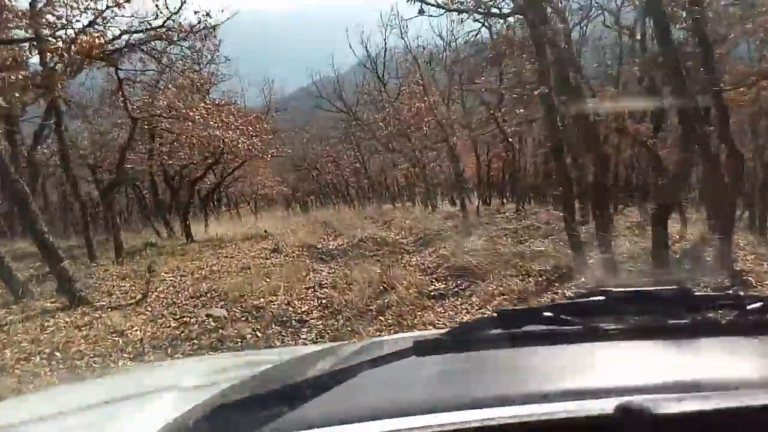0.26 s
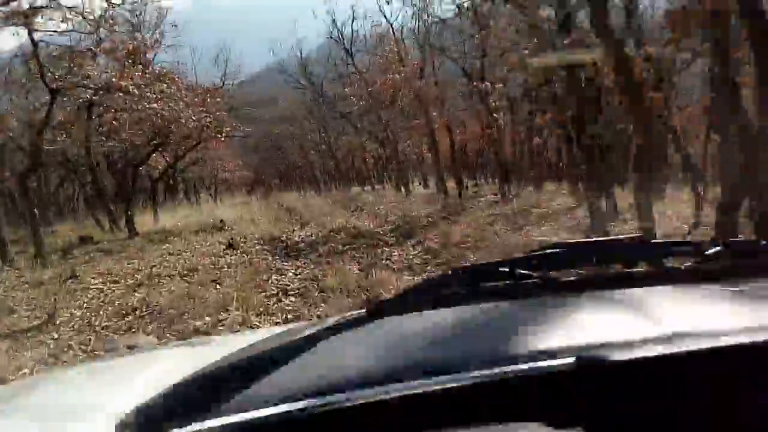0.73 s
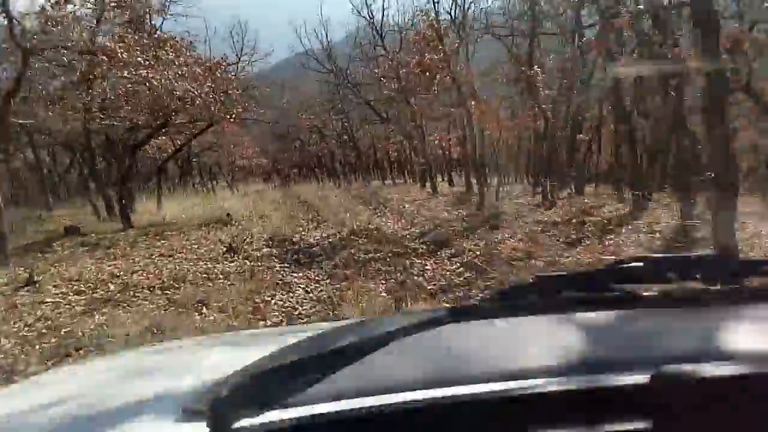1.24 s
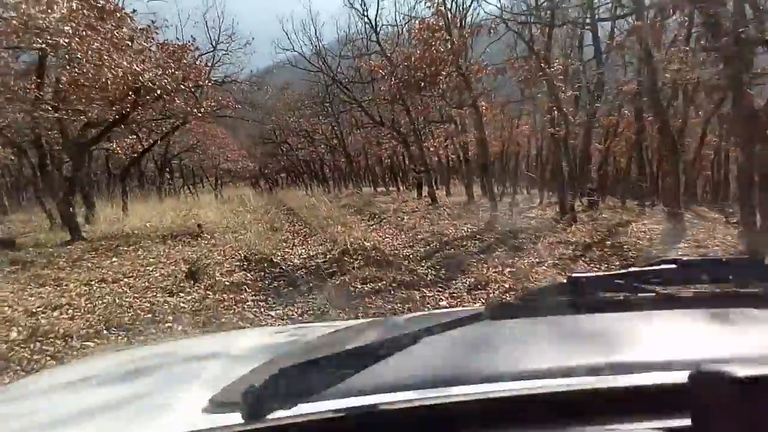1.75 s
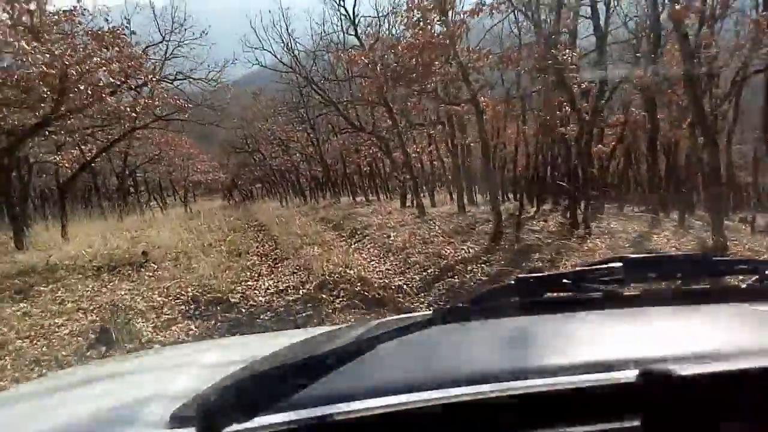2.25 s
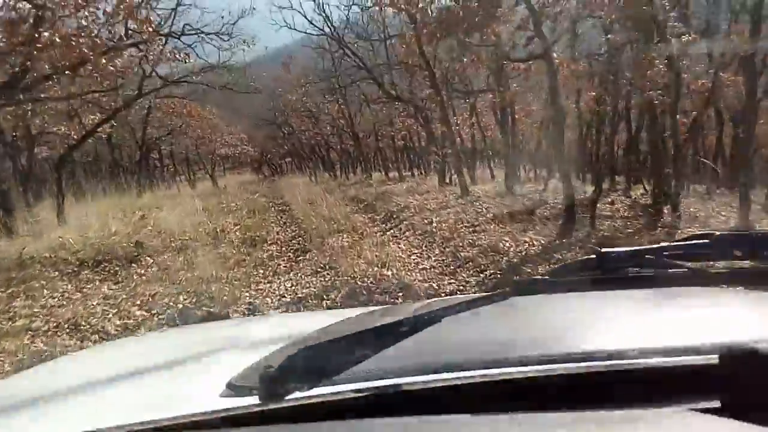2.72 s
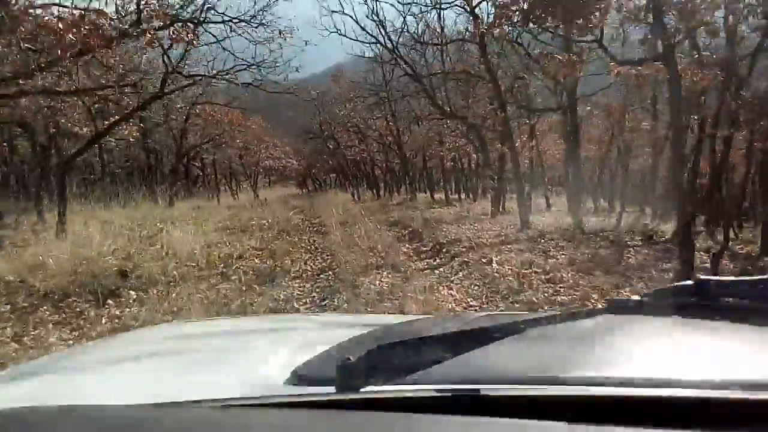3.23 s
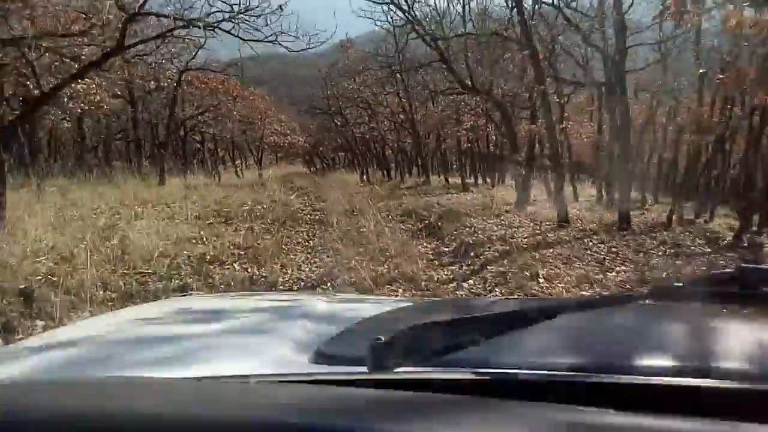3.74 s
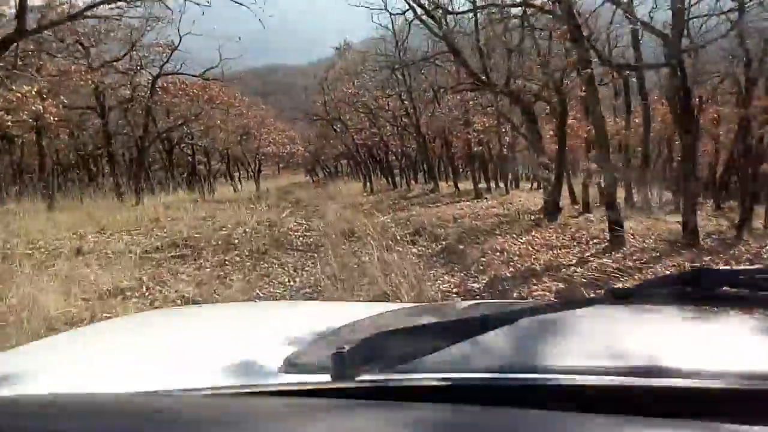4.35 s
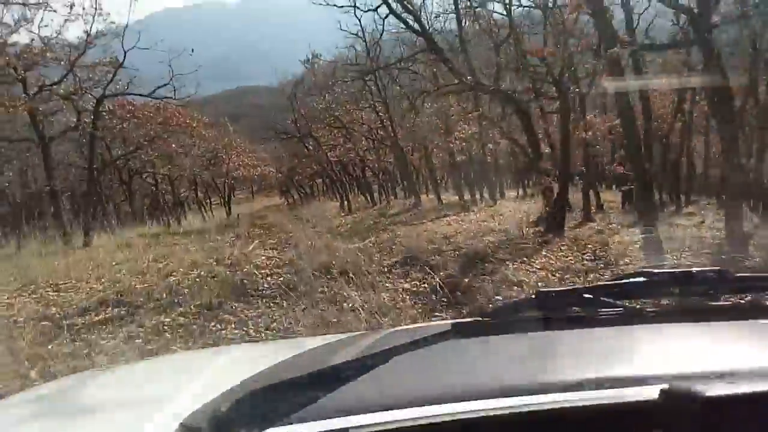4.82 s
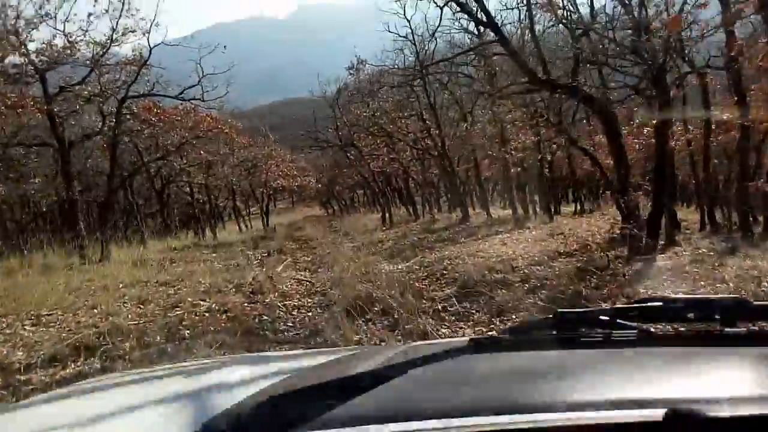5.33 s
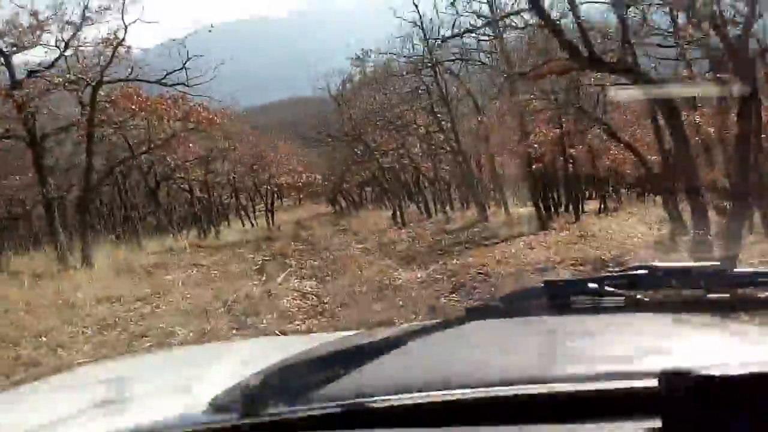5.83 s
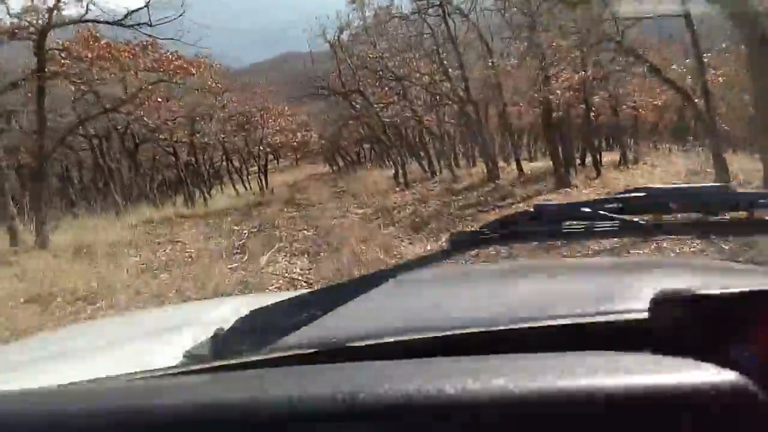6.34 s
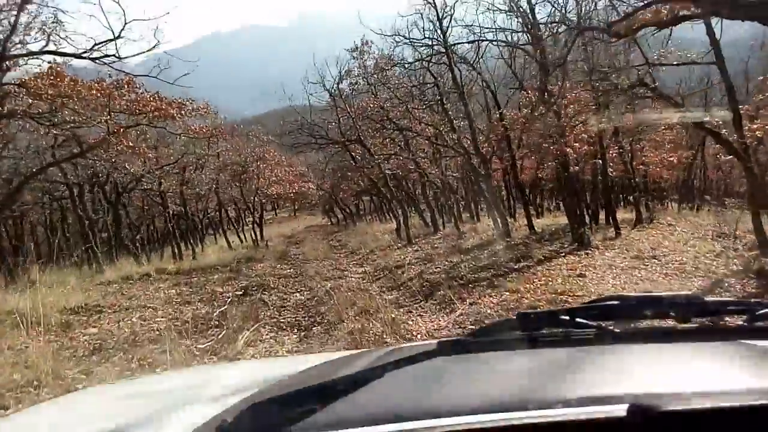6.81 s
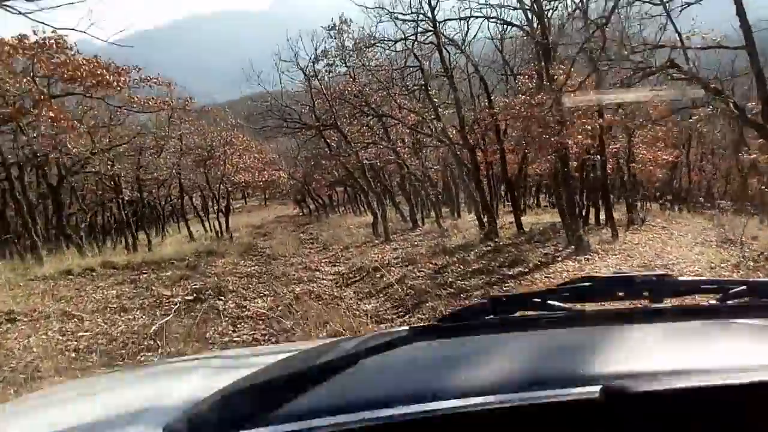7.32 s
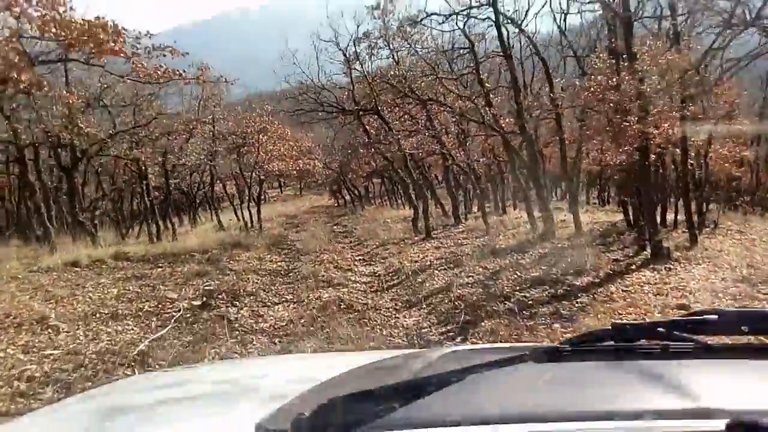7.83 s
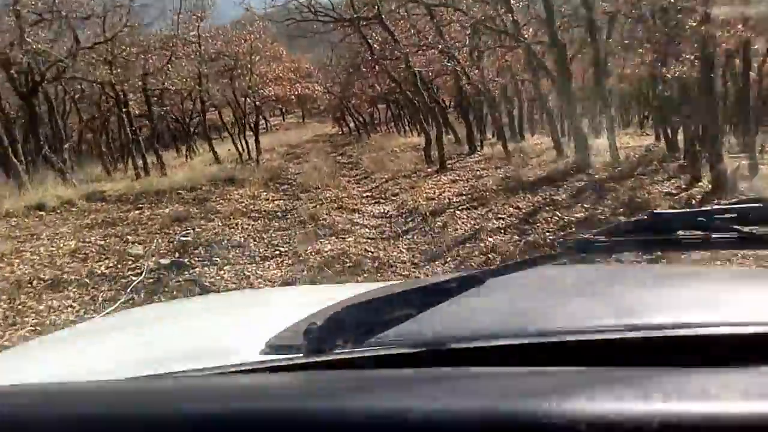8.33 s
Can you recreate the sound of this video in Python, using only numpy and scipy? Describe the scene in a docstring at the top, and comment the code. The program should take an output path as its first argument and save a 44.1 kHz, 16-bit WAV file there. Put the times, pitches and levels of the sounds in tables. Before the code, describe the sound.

A car cabin rumbles and knocks over uneven ground while dry leaves crunch, twigs snap sharply and small loose metal parts clink faintly.

```python
"""A low rumble with thuds: a car crawls along a rough, leafy woodland track, heard from inside the cabin.
The ground shakes the body (shaped noise) and knocks its panels (damped sines) over an engine hum (harmonics).
Leaves crackle (noise with random puffs), twigs snap (noise bursts with a short ring), a stem drags along a
panel (noise through sliding resonances) and small loose metal clinks (struck resonators).
The snaps and clinks excite a short cabin decay, and the whole is cut steeply above 15.75 kHz."""
import sys
import numpy as np
from scipy import signal
from scipy.fft import rfft, irfft, next_fast_len
from scipy.io import wavfile
from scipy.ndimage import map_coordinates

SR = 44100
rng = np.random.default_rng(int(sys.argv[2]) if len(sys.argv) > 2 else 0)


def generate_wav(sig):
    """Save sig (samples, or channels by samples) to the path in sys.argv[1] as 16-bit PCM at SR."""
    pcm = np.round(np.clip(np.atleast_2d(sig).T, -1, 1) * 32767).astype(np.int16)
    wavfile.write(sys.argv[1], SR, pcm)


N = 377937   # samples


def amp(db):
    """Decibel law: the amplitude gain of a level in dB."""
    return 10 ** (np.asarray(db) / 20)


def rms_one(x):
    """Power normalisation: scale to rms 1."""
    return x / np.sqrt(np.mean(x ** 2) + 1e-20)


def in_time(rows):
    """Linear interpolation: each column of a curve table at every sample."""
    times, *columns = np.transpose(rows)
    return [np.interp(np.arange(N) / SR, times, column) for column in columns]


def colour(x, spectrum, peaks=(), band=(1, 1e6)):
    """Spectral filtering by a (Hz, dB) curve, lifted resonances and a soft-edged band; white rms 1 stays 1."""
    size = next_fast_len(N)
    hz = np.arange(size // 2 + 1) * SR / size + 1   # offset by 1 Hz to keep the logarithm finite
    points = np.array(spectrum)
    db = np.interp(np.log(hz), np.log(points[:, 0]), points[:, 1])
    for peak_hz, width_hz, lift_db in peaks:
        db = db + lift_db / (1 + (2 * (hz - peak_hz) / width_hz) ** 2)
    edge_loss = np.sqrt((1 + (band[0] / hz) ** 12) * (1 + (hz / band[1]) ** 12))
    gain = rms_one(amp(db) / edge_loss)
    return irfft(rfft(x, size) * gain, size)[:N]


def drift(rate_hz):
    """Low-pass filtered noise: a slow random wander of rms 1."""
    step = 40   # samples between points of the wander
    r = np.exp(-2 * np.pi * step * rate_hz / SR)
    white = rng.standard_normal(N // step + 4002)
    slow = signal.lfilter([1], [1, -2 * r, r * r], white)[4000:]   # drop the filter's start-up
    return np.interp(np.arange(N) / step, np.arange(len(slow)), rms_one(slow))


def ring(clicks, hz, t60_s):
    """Damped resonator: a unit click sets a decaying sine of height 1 ringing."""
    r = amp(-60 / (t60_s * SR))
    w = 2 * np.pi * hz / SR
    return signal.lfilter([0, np.sin(w)], [1, -2 * r * np.cos(w), r * r], clicks + 1e-18)


def resonance(x, hz, width_hz):
    """Reciprocity of bandwidth and decay: noise through one resonator, scaled to rms 1."""
    return rms_one(ring(x, hz, np.log(1000) / np.pi / width_hz))


def puffs(per_s):
    """Shot noise: random short swells of uneven size, a few ms up and a little longer down."""
    size = amp(1.5 * np.minimum(rng.exponential(1, N), 4))
    born = (rng.random(N) < per_s / SR) * size
    r = np.exp(-1 / (0.0044 * SR))
    return signal.lfilter([np.e * (1 - r)], [1, -2 * r, r * r], born + 1e-18)


def rumble(boom_db, buzz_db):
    """Forced vibration: rough ground shakes chassis, floor and panels, and the cabin air sings along."""
    # slow course of the deep chassis rumble [t/s, level/dB]
    deep_course = [(0.0, -30.5), (0.43, -26.5), (0.62, -32.5), (1.96, -28.5), (3.27, -25.5), (3.51, -26.5),
                   (3.94, -24), (6.66, -26), (6.9, -32), (8.35, -30), (8.57, -30)]
    # spectra of chassis, floor and panels [f/Hz, relative level/dB per Hz]
    deep_spectrum = [(8.8, -52.5), (15, -22.5), (49, -4), (108, -7.5), (130, -8), (170, -24), (290, -120)]
    boom_spectrum = [(41, -20.5), (70, -3), (145, 0), (199, -3.5), (324, -16.5), (372, -26.5), (400, -18),
                     (520, -28), (880, -120)]
    buzz_spectrum = [(120, -31.5), (200, -5), (234, -5), (360, -4), (705, -13.5), (955, -12.5), (1180, -32),
                     (1300, -16), (1800, -46), (2340, -59.5), (3960, -120)]
    # cabin resonances [f/Hz, width/Hz, level/dB relative to the mean boom setting]
    air_modes = [(147, 7, -6), (233, 9, -12), (92, 8, -13)]
    air_shake = 0.18   # share of the swing of the boom, in dB, that the cabin air follows
    drone_hz, drone_width_hz, drone_db = 925, 310, -48.5   # steady hollow note of the engine bay

    white = rng.standard_normal((4, N))
    deep = amp(in_time(deep_course)[0]) * colour(white[0], deep_spectrum)
    boom = amp(boom_db - 1.0 + 2.2 * drift(6.1)) * colour(white[1], boom_spectrum)
    buzz = amp(buzz_db + 1.5 * drift(14)) * colour(white[3], buzz_spectrum)
    air = sum(amp(db) * resonance(white[2], hz, width_hz) for hz, width_hz, db in air_modes)
    air_db = boom_db.mean() + air_shake * (boom_db - boom_db.mean())
    drone = amp(drone_db) * resonance(white[0], drone_hz, drone_width_hz)
    return deep + boom + amp(air_db) * air + buzz + drone


def thuds():
    """Impact response: a soft push rings the struck part at its pitch and at a fifth above."""
    # wheels over roots and stones knock floor, panels and trim
    # [t/s, level/dB before the soft rise and the upper partial, f/Hz]
    knocks = [(1.112, -10, 133.5), (1.212, -7, 128), (1.283, -15, 142), (1.808, -12, 152),
              (2.244, -8.5, 145.7), (2.417, -9, 152), (2.435, -14, 459), (2.771, -17.5, 156),
              (3.085, -6, 128), (3.125, -6, 134), (3.21, -14, 168), (3.736, -5.5, 185), (3.819, -17.5, 495),
              (3.93, -6, 120), (3.977, -1, 130.5), (4.027, -18, 408), (4.052, -18.5, 1240),
              (4.066, -16, 355), (4.196, -6.5, 136), (4.366, -11, 157), (4.571, -6.5, 85),
              (4.697, -8.5, 188), (4.799, -4.5, 132.5), (4.799, -14, 456), (4.904, -4.5, 134),
              (5.04, -2, 186.5), (5.097, -24, 1330), (5.119, -4.5, 121), (5.168, -15.5, 405),
              (5.185, -21, 1300), (5.322, -13, 114), (5.378, -24, 950), (5.394, -15.5, 517),
              (5.441, -6.5, 140), (5.449, -16, 408), (6.05, -23, 1920), (6.093, -5.5, 140),
              (6.195, -10, 171), (6.556, -19.5, 450), (6.565, -16, 102), (7.003, -21, 1244),
              (7.137, -20, 141), (7.206, -20, 473), (8.039, -13.5, 137), (8.045, -16.5, 457)]
    t60_at_150_hz, t60_slope = 0.12, -.4   # s; power of pitch: higher panels die sooner
    rise_s = 0.0035

    out = np.zeros(N + SR)
    t = np.arange(SR // 2) / SR
    rise = 1 - np.exp(-t / rise_s)
    for s, db, hz in knocks:
        t60_s = t60_at_150_hz * (hz / 150) ** t60_slope
        wave = np.sin(2 * np.pi * hz * t) + 0.43 * np.sin(2 * np.pi * 1.5 * hz * t)
        i = round(s * SR)
        out[i:i + len(t)] += amp(db - 60 * t / t60_s) * rise * wave
    return out[:N]


def engine():
    """Periodic excitation: low orders of the firing rate, each wavering in strength."""
    # course of the engine [t/s, mean firing rate/Hz, level/dB applied to the sum of orders]
    running = [(0, 72, -32.5), (1.2, 44, -32.5), (2.2, 58, -23.5), (3.6, 58, -33), (5.5, 63, -48),
               (7, 43.4, -42), (8.57, 56.5, -33.5)]
    # partials of the hum [multiple of the firing rate, mean relative level/dB]
    orders = [(1, 0), (1.5, -10), (2, -11), (3, -14), (4, -14)]

    rate_hz, level_db = in_time(running)
    unsteady_hz = rate_hz * (1 + 0.01233 * drift(3.9))
    phase = 2 * np.pi * np.cumsum(unsteady_hz) / SR
    hum = 0
    for order, db in orders:
        hum = hum + amp(db + 2 * drift(2)) * np.sin(order * phase + rng.uniform(0, 2 * np.pi))
    return amp(level_db) * hum


def leaves(level_db):
    """Granular fracture: dry leaves crush under the tyres as patchy hiss with wide and one-band puffs."""
    # spectrum of the crushed leaves [f/Hz, relative level/dB per Hz]
    leaf_spectrum = [(590, -31), (1000, 0), (2180, -5.5), (2550, -3), (2800, -6.5), (3090, -6.5),
                     (3930, -9), (4160, -8.5), (5050, -4), (5720, -0.5), (6480, -5), (10000, -63),
                     (13000, -88.5), (22000, -120)]
    puff_crush = 0.73   # share of the swing of crush, in dB, that the rate of puffs follows
    edges_hz = [500, 1600, 2600, 4000, 5600, 8000, 16000]

    white = rng.standard_normal((2, N))
    busy = amp(puff_crush * (level_db - level_db.mean()))
    shared = drift(9)
    wide = puffs(24.0 * busy)
    out = 0
    for k, (low, high) in enumerate(zip(edges_hz, edges_hz[1:])):
        bandpass = signal.butter(2, [low, high], "band", fs=SR, output="sos")
        band = signal.sosfilt(bandpass, white[k % 2])
        patches = amp(busy * (1.2 * shared + 1.8 * drift(16.3)))   # busier crushing is patchier
        out = out + band * patches * (1 + 0.49 * wide + 0.56 * puffs(9.0 * busy))
    return amp(level_db) * rms_one(colour(out, leaf_spectrum))


def snaps():
    """Brittle fracture: a crackly burst swells briefly, brighter with its pitch, with a short unsteady ring."""
    # snaps and rattles [t/s, reference level/dB, ring f/Hz,
    # low band/dB and top band/dB relative to the reference, t60/s]
    breaks = [(0.9233, -15.5, 3210, -8, -56, 0.06), (1.1672, -23.5, 2030, -5, -34, 0.041),
              (1.4401, -17.5, 5730, -16, -59, 0.092), (1.492, -13.5, 5670, -13, -57, 0.031),
              (1.6322, -27.5, 5670, -1, -47, 0.16), (1.8848, -22.5, 2430, -5, -47, 0.06),
              (2.1505, -21, 5813, -4, -50, 0.06), (2.394, -15.5, 2070, -7.5, -42, 0.085),
              (2.403, -7, 5320, -12, -34, 0.08), (2.4882, -14, 2020, -6.5, -24, 0.094),
              (2.5532, -10, 4050, -21, -49, 0.034), (2.743, -4.5, 5630, -17, -45, 0.037),
              (2.8235, -16.5, 3830, -18, -35, 0.053), (2.8374, -20.5, 5640, -16, -39, 0.051),
              (2.8977, -23.5, 6200, -21, -11, 0.045), (2.9706, -9.5, 5570, -13.5, -43, 0.032),
              (3.036, -11, 5900, -17, -26, 0.09), (3.0734, -13.5, 5960, -12.5, -26, 0.082),
              (3.0974, -19.5, 2980, -10, -32, 0.052), (3.1203, -14, 2100, -12, -38, 0.041),
              (3.1436, -8.5, 5900, -29, -43, 0.051), (3.1624, -13, 5400, -22.5, -33, 0.052),
              (3.282, -19, 6400, -8.5, -45, 0.057), (3.5475, -10, 3610, -10, -37, 0.031),
              (3.6516, -25, 5760, -9, -22, 0.06), (3.695, -17.5, 2590, -7, -34, 0.073),
              (3.723, -19, 3310, -18, -25, 0.06), (3.8303, -13, 3610, -12.5, -33, 0.054),
              (3.8632, -6.5, 4870, -17, -60, 0.053), (3.912, -13.5, 5770, -16, -29, 0.05),
              (3.978, -15.5, 5120, -21.5, -19, 0.049), (4.012, -27, 3510, -1, -42, 0.035),
              (4.05, -32.5, 2040, 8, -29, 0.032), (4.0978, -15, 6230, -12, -23, 0.052),
              (4.1163, -14, 3520, -8, -34, 0.088), (4.154, -10.5, 4950, -9, -43, 0.083),
              (4.2512, -21.5, 5610, -20, -23, 0.078), (4.3725, -10, 2110, -12, -30, 0.06),
              (4.4513, -13, 3580, -12, -46, 0.06), (4.5316, -23, 5130, -15, -35, 0.021),
              (4.611, -18, 2300, -16, -39, 0.072), (4.6415, -4, 5570, -18.5, -42, 0.072),
              (4.6572, -10, 5800, -16.5, -38, 0.048), (4.727, -12, 5800, -9, -48, 0.072),
              (4.7948, -9, 5300, -8.5, -53, 0.038), (4.8487, -11.5, 3780, -12, -43, 0.06),
              (4.8788, -16, 3740, -22, -36, 0.052), (5.0005, -19.5, 6130, -16, -48, 0.065),
              (5.1018, -24, 5390, -0.5, -30, 0.074), (5.225, -8, 3500, -16.5, -49, 0.06),
              (5.2708, -5, 4410, -13, -51, 0.063), (5.341, -12, 5550, -16.5, -47, 0.031),
              (5.3783, -15, 2900, -9.5, -44, 0.06), (5.4929, -7, 5330, -11.5, -56, 0.1),
              (5.5935, -18, 2400, -15, -41, 0.06), (5.691, -13.5, 5920, -18, -21, 0.073),
              (6.0604, -21.5, 1960, -10, -14, 0.055), (6.1524, -22.5, 3870, -3.5, -38, 0.1),
              (6.3046, -21, 5780, -14.5, -24, 0.05), (6.6697, -7.5, 3200, -12.5, -44, 0.053),
              (6.7384, -22.5, 5690, -17, -18, 0.048), (6.8169, -21.5, 5930, -9, -40, 0.045),
              (6.8583, -21, 3190, -22, -50, 0.028), (6.903, -23, 2310, -5, -43, 0.073),
              (7.0024, -23.5, 5050, -10, -40, 0.07), (7.0825, -11.5, 3620, -17, -44, 0.054),
              (7.1217, -19.5, 5870, -19, -37, 0.051), (7.493, -13, 5860, -15.5, -45, 0.06),
              (7.5598, -13, 3140, -16, -40, 0.04), (7.7797, -25, 5750, 0, -43, 0.046),
              (8.0616, -11, 5970, -8, -43, 0.1), (8.083, -8, 6160, -14.5, -49, 0.052),
              (8.1421, -10, 5970, -25, -30, 0.06), (8.1644, -25, 6100, -18, -8, 0.073),
              (8.2797, -5.5, 4820, -12.5, -44, 0.043), (8.3449, -27, 5960, -19, -36, 0.055),
              (8.4168, -18.5, 2160, -11, -20, 0.11), (8.4756, -21.5, 5840, -8, -43, 0.04)]
    # spectrum of the crackle [f/Hz, relative level/dB per Hz]
    snap_spectrum = [(290, -29.5), (500, 3.5), (1060, -4.5), (1340, -2.5), (2100, -4.5), (2350, -3.5),
                     (3530, 0.5), (4200, -1.5), (5530, 3), (6390, 5), (8660, -27.5), (12800, -31),
                     (14400, -36.5), (15200, -23), (15900, -39.5)]
    swell_share = 0.092   # swell time as a share of t60
    middle_db, ring_db = -9, -8.5   # middle band and ring, relative to the reference level
    bright_at_4_khz_db, bright_tilt = -13.5, 1   # bright band re reference; dB per octave of ring pitch
    edges_hz = [300, 2000, 4500, 8500, 17000]   # low, middle, bright and top bands

    gates, rings = np.zeros((4, N + SR)), np.zeros(N + SR)
    t = np.arange(SR // 3) / SR
    for s, db, hz, low_db, top_db, t60_s in breaks:
        decay_s = max(t60_s, .015)
        swell_s = swell_share * decay_s
        bright_db = bright_at_4_khz_db + bright_tilt * np.log2(hz / 4000)
        fall_db = 60 * (t / decay_s) ** 1.094   # the fall in dB steepens slightly with time
        shape = amp(db - fall_db) * (1 - np.exp(-(t / swell_s) ** 2))
        i = round((s - 0.6 * swell_s) * SR)   # start ahead, so that the swell is well up at s
        gates[:, i:i + len(t)] += amp([[low_db], [middle_db], [bright_db], [top_db]]) * shape
        rings[i:i + len(t)] += shape * np.sin(2 * np.pi * hz * t)

    grain_db = 2 * rng.standard_normal(N // 24 + 1).repeat(24)[:N]   # a new level every 24 samples
    crackle = rms_one(rng.standard_normal(N) * amp(grain_db))
    bursts = sum(colour(crackle * gates[k, :N], snap_spectrum, band=edges_hz[k:k + 2]) for k in range(4))
    return bursts + amp(ring_db) * rings[:N] * drift(110)


def drag():
    """Frictional excitation: dense slips drive panel resonances as a stem slides; pressure arches up and down."""
    # spectrum of the slips [f/Hz, relative level/dB per Hz]
    slip_spectrum = [(900, -44), (1500, -16), (2700, -11), (4500, -9.5), (5300, -4), (6500, -3.5),
                     (7300, -16), (8300, -30), (10400, -37.5), (13400, -37), (15000, -25), (15800, -32)]
    # panel resonances before the slide in pitch [f/Hz, width/Hz, lift/dB]
    panel_modes = [(2420, 140, 6), (3080, 140, 11), (4200, 80, 6), (4900, 200, 14), (5700, 240, 11),
                   (6300, 100, 5), (8450, 140, 7), (9320, 80, 6), (11750, 250, 8), (12800, 120, 6),
                   (15200, 50, 8)]
    start_s, press_s, end_s, edge_s = 6.96, 7.22, 7.56, .03   # touches, presses hardest, lets go; fade time
    level_db, sag_db = -29.5, 9   # overall setting; fall from full pressure to both ends
    bend = .02   # resonances slide down by this share on either side of full pressure

    s = np.arange(N) / SR
    touch = np.clip(np.minimum(s - start_s, end_s - s) / edge_s + .5, 0, 1)
    along = np.interp(s, [start_s, press_s, end_s], [-1, 0, 1])
    slips = rng.standard_normal(N) * amp(2 * drift(130))
    scrape = colour(slips, slip_spectrum, panel_modes)
    read = np.arange(N) - np.cumsum(bend * along * touch)   # faster reading first, slower later
    bent = map_coordinates(scrape, [read], order=3)
    return touch * amp(level_db - sag_db * along ** 2) * rms_one(bent)


def clinks(rattle_db):
    """Modal excitation: a clink rings the part nearest its pitch, others faintly; a fine rattle runs between."""
    # clinks [t/s, strike level/dB, f/Hz of the part that rings most]
    strikes = [(0.0977, -28, 15200), (2.5147, -19, 6160), (2.5157, -34, 15100), (2.9048, -40, 15200),
               (3.0185, -34, 15200), (3.1043, -15.5, 7210), (3.1662, -36, 15200), (3.4725, -24.5, 6270),
               (3.473, -29, 15200), (3.5603, -41, 15300), (3.6511, -44, 15100), (3.704, -44, 10500),
               (3.7564, -36, 15600), (3.7604, -29, 7780), (3.935, -41, 14100), (4.0826, -43, 15200),
               (4.0955, -32, 15200), (4.0981, -28, 6250), (4.2048, -39, 15700), (4.3919, -43, 15100),
               (4.5326, -38, 7400), (4.6468, -35, 15200), (4.6982, -42, 15200), (4.7566, -22, 7400),
               (4.9092, -45, 15200), (6.0665, -38, 15200), (7.2085, -38, 15200), (8.1479, -33, 14700)]
    # parts of loose metal [f/Hz, t60/s]
    parts = [(5600, 0.1), (6250, 0.034), (7210, 0.026), (7400, 0.046), (7780, 0.054), (10520, 0.026),
             (11700, 0.15), (13950, .035), (14750, .08), (15180, 0.088), (15650, .055)]
    # spectrum of the fine rattle [f/Hz, relative level/dB per Hz]
    rattle_spectrum = [(7000, -52), (9000, -22), (12500, -20), (14200, -11), (15000, -5), (15700, -9)]

    s, db, pitch_hz = np.transpose(strikes)
    at = np.round(s * SR).astype(int)
    part_hz = np.array(parts)[:, 0]
    nearest = np.abs(np.log(pitch_hz[:, None] / part_hz)).argmin(axis=1)
    out = np.zeros(N)
    for k, (hz, t60_s) in enumerate(parts):
        faint_db = 33.5 + 20 * rng.random(len(at))
        clicks = np.zeros(N)
        np.add.at(clicks, at, amp(db - (nearest != k) * faint_db))
        # two resonators in a row: the ring builds up over a millisecond
        onset = ring(clicks, hz, 0.0043) * 2 * np.log(1000) / (0.0052 * SR)
        out += ring(onset, hz, t60_s)
    rattle = rng.standard_normal(N) * amp(4.0 * drift(25))
    return out + amp(rattle_db) * rms_one(colour(rattle, rattle_spectrum))


def cabin(x):
    """Diffuse reverberation: convolution with a short dense decay off glass and trim."""
    t60_s = 0.19
    t = np.arange(round(.2 * SR)) / SR
    tail = rng.standard_normal(len(t)) * amp(-60 * t / t60_s) * (t > .002)
    return signal.fftconvolve(x, tail / np.sqrt(np.sum(tail ** 2)))[:N]


def scene():
    """Superposition: all sources in the cabin, one channel, tied together by the ride."""
    # the ride before the offsets below [t/s, shake of the body/dB, crush of leaves/dB]
    ride = [(0.0, -28, -40), (1.19, -26, -42), (2.22, -24.5, -39.5), (2.89, -27.5, -38),
            (3.08, -22.5, -34.5), (3.48, -23.5, -38.5), (3.98, -20, -37.5), (4.51, -26.5, -37.5),
            (5.06, -21.5, -38), (5.32, -21.5, -34.5), (5.92, -29.5, -40), (6.13, -24, -39.5),
            (6.97, -32, -37.5), (7.19, -27.5, -38.5), (7.33, -30.5, -41), (7.59, -29, -40),
            (8.26, -27.5, -37), (8.57, -15.5, -37.5)]
    boom_offset_db, leaf_offset_db = 2, 1.5
    buzz_mean_db, buzz_shake, buzz_crush = -35, 0.39, 0.24   # at a mean ride; shares of both swings in dB
    rattle_mean_db, rattle_crush = -66.5, 1.4   # at a mean ride; share of the swing of crush in dB
    cabin_db = -13.5

    shake_db, crush_db = in_time(ride)
    shake_swing = shake_db - shake_db.mean()
    crush_swing = crush_db - crush_db.mean()
    buzz_db = buzz_mean_db + buzz_shake * shake_swing + buzz_crush * crush_swing
    low = rumble(shake_db + boom_offset_db, buzz_db) + thuds() + engine()
    hits = snaps() + clinks(rattle_mean_db + rattle_crush * crush_swing)
    mix = low + leaves(crush_db + leaf_offset_db) + drag() + hits + amp(cabin_db) * cabin(hits)
    return mix[None]


def record(dry):
    """Band limitation: a steep elliptic low-pass cuts the top."""
    cutoff_hz = 15750
    lowpass = signal.ellip(12, .5, 70, cutoff_hz, fs=SR, output="sos")
    return signal.sosfilt(lowpass, dry)


dry = scene()
out = record(dry)
generate_wav(out)
```